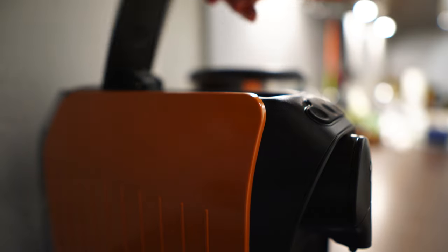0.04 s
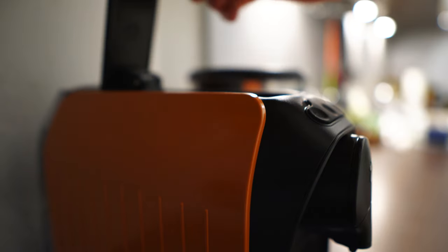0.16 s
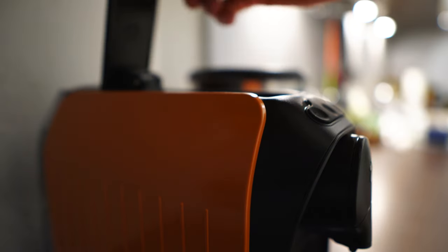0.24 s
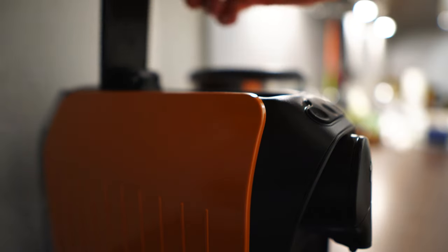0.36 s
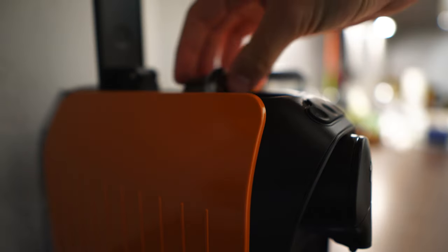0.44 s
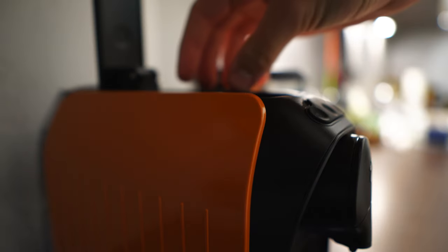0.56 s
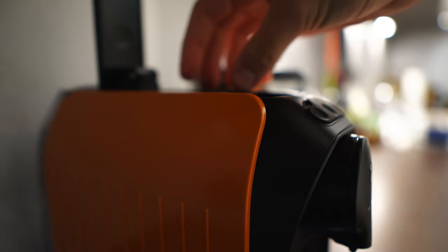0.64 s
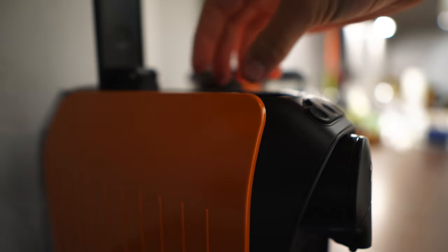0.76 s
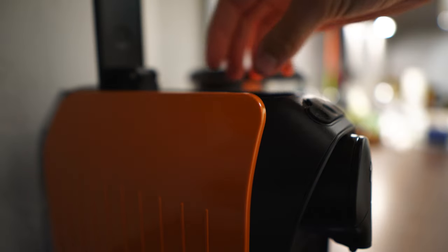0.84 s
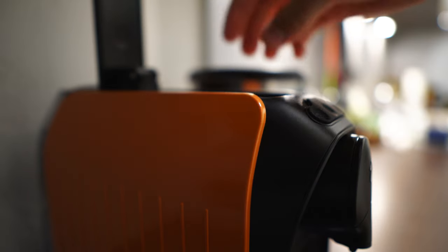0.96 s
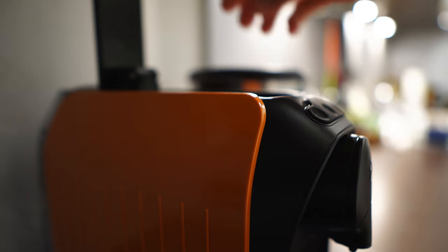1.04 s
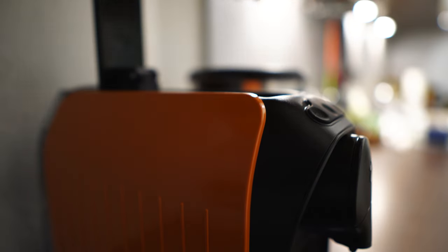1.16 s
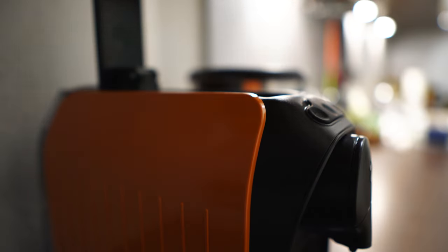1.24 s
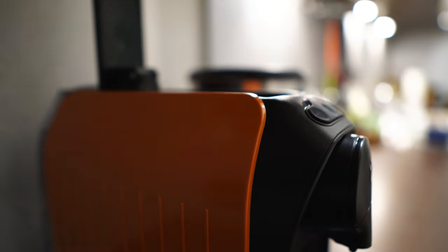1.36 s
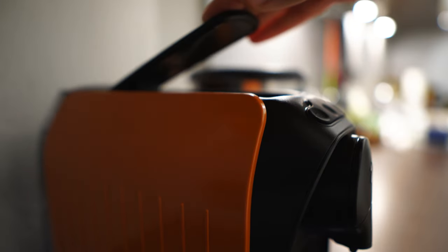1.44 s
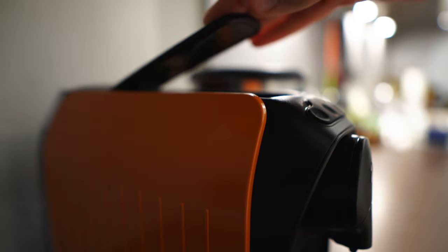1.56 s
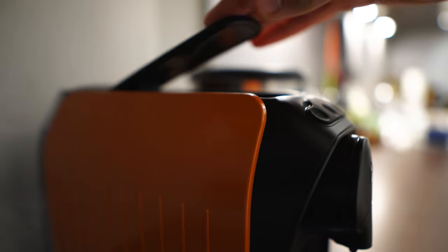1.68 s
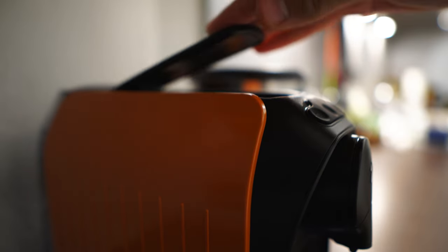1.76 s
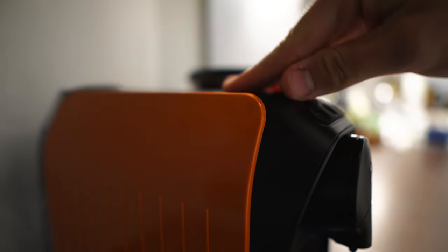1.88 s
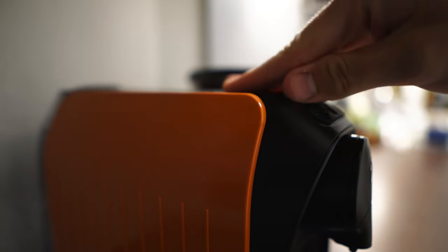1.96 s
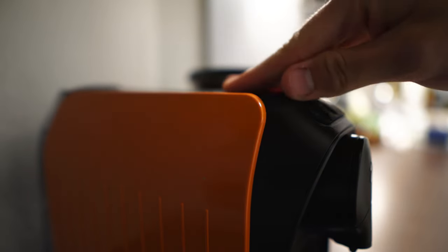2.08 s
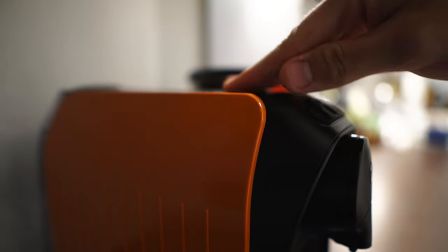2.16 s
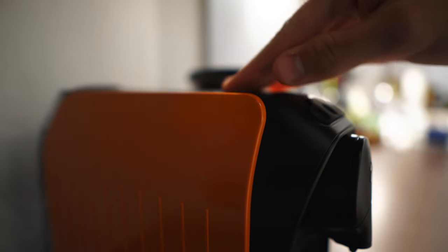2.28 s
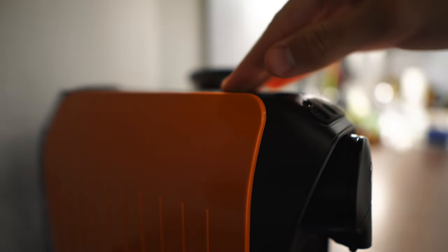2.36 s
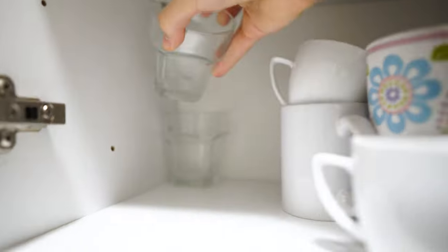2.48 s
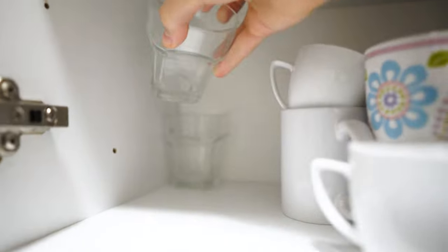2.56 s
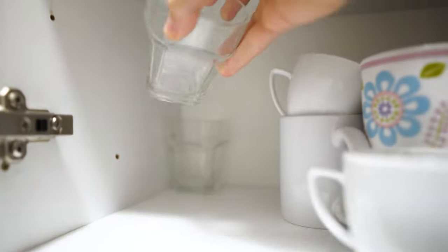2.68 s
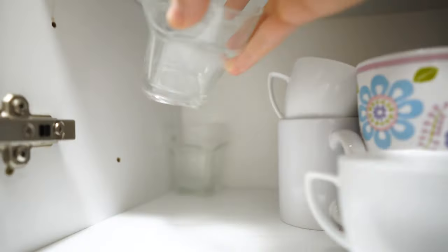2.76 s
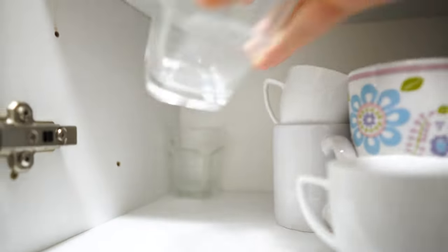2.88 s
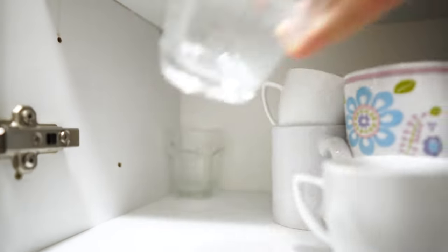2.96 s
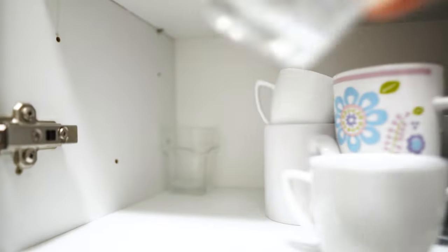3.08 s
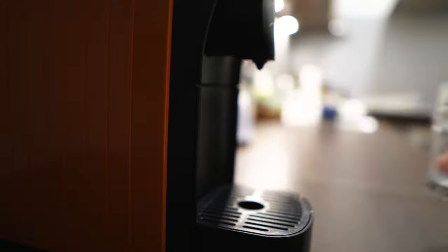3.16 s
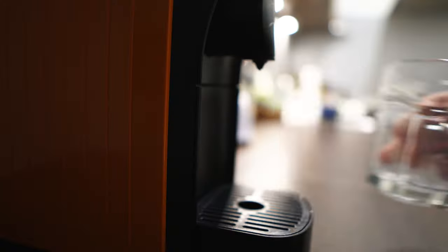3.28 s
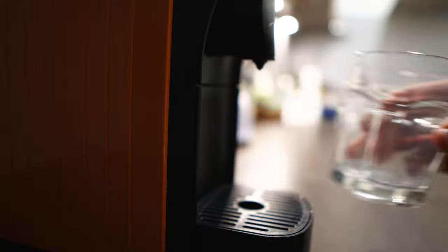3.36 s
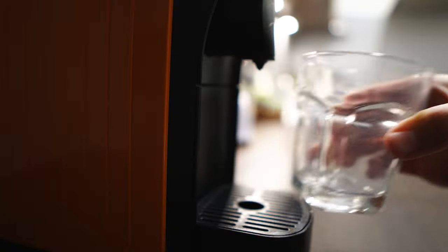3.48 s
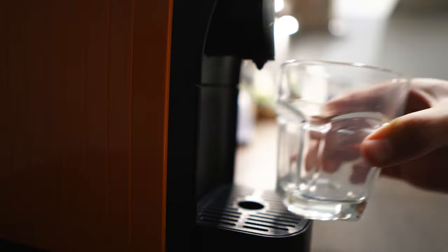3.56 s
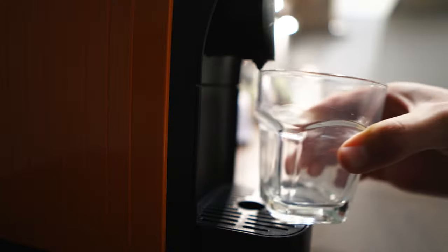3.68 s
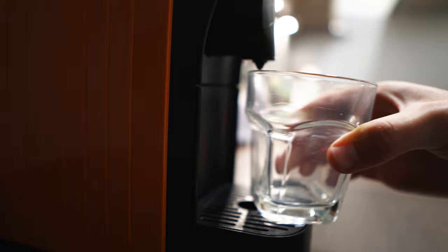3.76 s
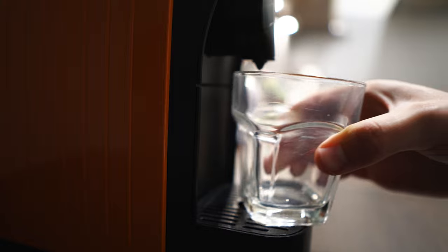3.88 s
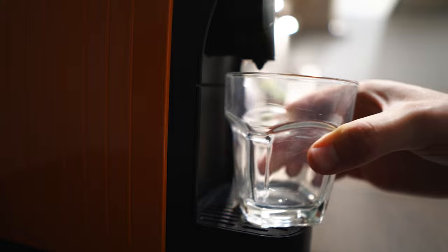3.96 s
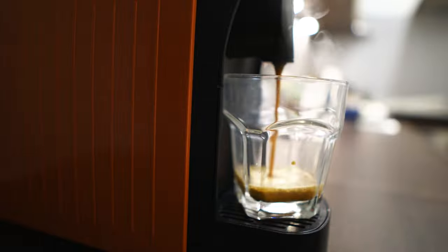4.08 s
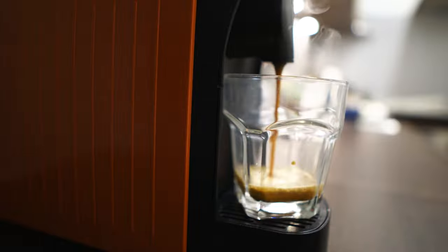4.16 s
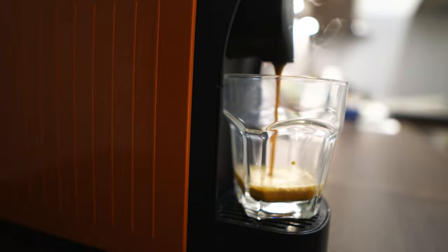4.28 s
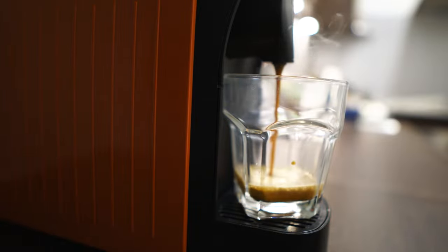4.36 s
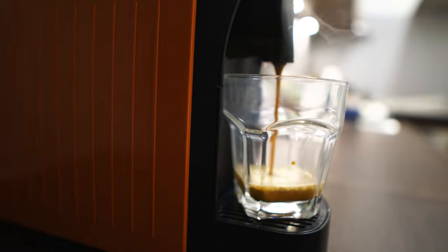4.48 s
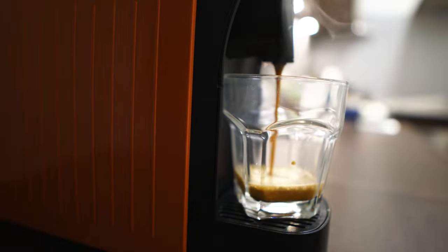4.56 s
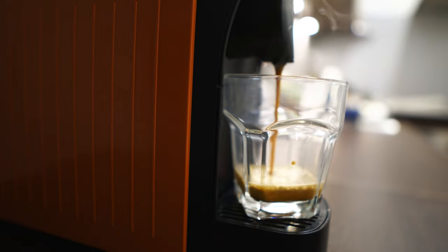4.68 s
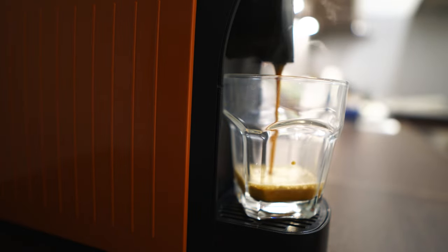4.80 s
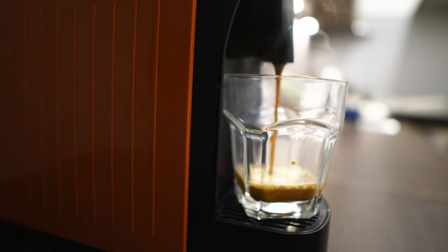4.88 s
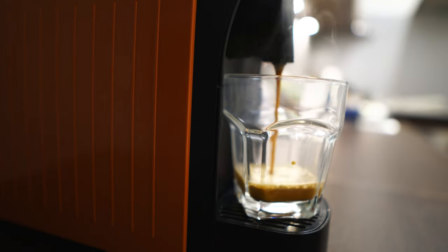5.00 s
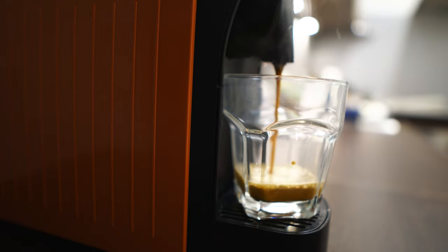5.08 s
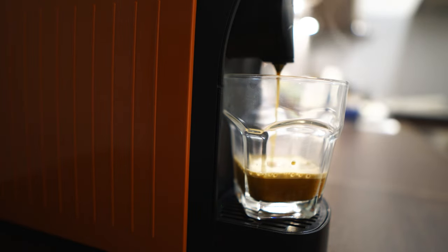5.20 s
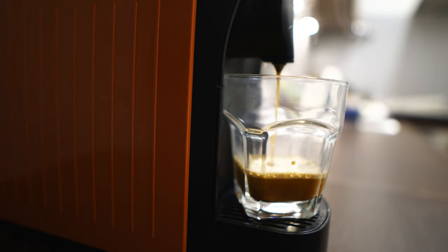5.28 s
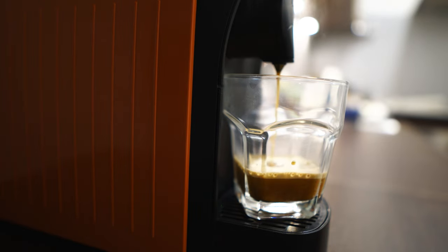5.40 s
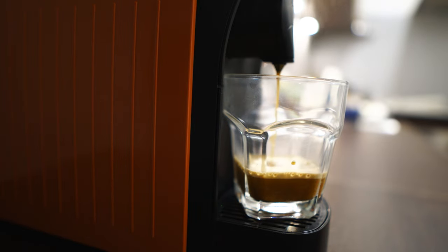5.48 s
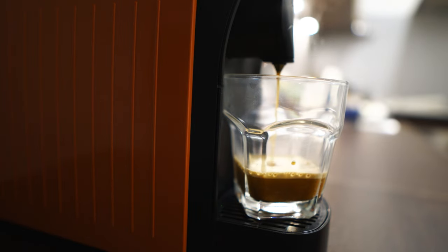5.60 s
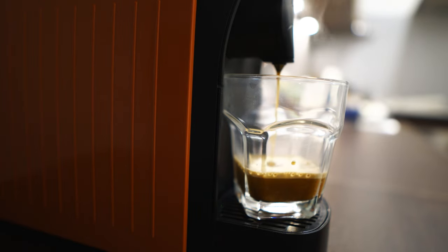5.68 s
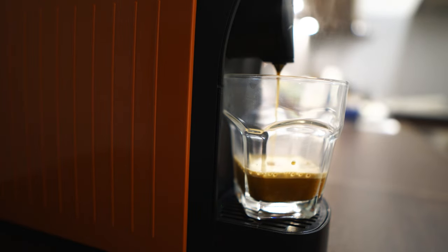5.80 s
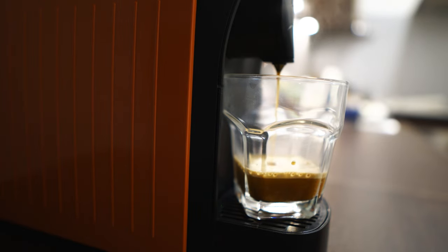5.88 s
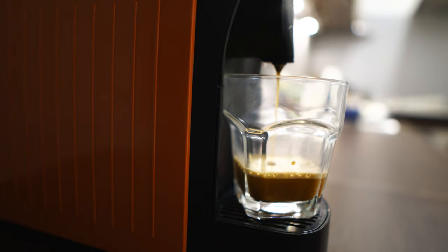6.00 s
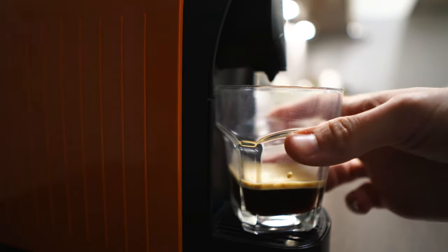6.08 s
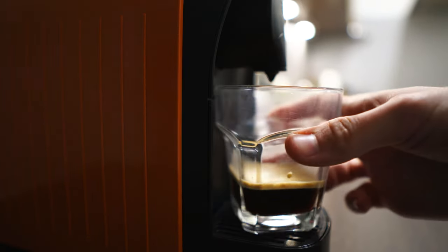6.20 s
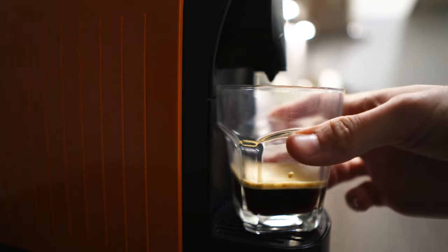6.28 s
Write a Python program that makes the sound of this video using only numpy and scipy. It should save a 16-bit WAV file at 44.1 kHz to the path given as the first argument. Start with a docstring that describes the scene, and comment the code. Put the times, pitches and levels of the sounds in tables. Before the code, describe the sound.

A coffee machine lever cracks open, a capsule drops in, the lever latches shut, a glass lands, then the pump hums briefly and coffee trickles.

```python
"""A capsule espresso machine in a small kitchen, heard from close by over quiet room air.
The lever rubs up, cracks against its stop and chatters; a capsule scrapes in and drops; the lever is pressed shut and latches.
Fingers brush and squeak; a glass lands on the drip tray and is pushed into place; the pump kicks and hums briefly.
Coffee gushes and hisses on in a thin stream joined by drops; at 6.15 s all but pump and background is faded out within 2 ms.
Blows are short noise bursts, coloured and ringing through resonances; rubbing and the coffee stream are random grains,
coloured and faded; the kitchen answers with a diffuse tail."""
import sys
import numpy as np
from scipy import signal
from scipy.fft import rfft, irfft
from scipy.io import wavfile

SR = 44100
rng = np.random.default_rng(int(sys.argv[2]) if len(sys.argv) > 2 else 0)


def materialize(psi):
    """Save the field psi as 16-bit PCM at rate SR to the path in sys.argv[1].

    A 1-D psi becomes a single channel; in a 2-D psi each row is a channel.
    """
    bounded = np.clip(np.atleast_2d(psi).T, -1, 1)
    quanta = np.round(bounded * 32767).astype(np.int16)
    wavfile.write(sys.argv[1], SR, quanta)


N = 279638
TIME = np.arange(N) / SR   # s
SHORT = 16384   # samples in one short blow
BREW_START_S = 4.147   # the pump kicks in and coffee starts to run
FOREGROUND_END_S = 6.15   # all but pump and background has faded out
# How long the kitchen's reflections linger. Each row: frequency in Hz, time to fall by 60 dB in seconds.
KITCHEN_DECAY = [(100, .45), (250, .45), (700, .45), (1500, .48), (5000, 0.46), (8000, .43), (11000, 0.28),
                 (16000, 0.23)]


def amp(db):
    """Decibels to gain."""
    return 10 ** (np.asarray(db) / 20)


def unit(x):
    """Scale to an energy of one."""
    return x / np.sqrt(np.sum(x ** 2) + 1e-20)


def blow_gain(db):
    """Gain that gives a unit-energy blow this level over ten milliseconds."""
    return amp(db) * np.sqrt(SR / 100)


def at_hz(points, hz):
    """Read a table on a log-frequency axis."""
    points = np.array(points)
    return np.interp(np.log(np.maximum(hz, 1)), np.log(points[:, 0]), points[:, 1])


def add(track, s, sound):
    """Mix a sound in at a time."""
    start = max(round(s * SR), 0)
    track[start:start + len(sound)] += sound[:N - start]


def colour(x, spectrum):
    """Causal (minimum-phase) filter with the shape of the given spectrum and unit power gain."""
    level_db = at_hz(spectrum, np.fft.rfftfreq(SHORT, 1 / SR))
    cepstrum = irfft(np.log(amp(level_db)))
    # folding the cepstrum onto positive times makes the filter minimum-phase
    cepstrum[1:SHORT // 2] *= 2
    cepstrum[SHORT // 2 + 1:] = 0
    response = unit(irfft(np.exp(rfft(cepstrum))))
    return signal.fftconvolve(x, response)[:len(x)]


def resonate(x, modes):
    """Parallel resonances with alternating signs; a narrower one rings longer."""
    out = 0
    for k, (hz, width, db) in enumerate(modes):
        r = np.exp(-np.pi * width / SR)
        poles = [1, -2 * r * np.cos(2 * np.pi * hz / SR), r * r]
        ring = (1 - r * r) / 2 * signal.lfilter([1, 0, -1], poles, x + 1e-18)
        out = out + (-1) ** k * amp(db) * ring
    return out


def contact(fade_s):
    """A flurry of micro-contacts that dies fast, about equally strong at all frequencies."""
    t = TIME[:SHORT]
    fade = amp(-30 * np.minimum(t / fade_s, 10))   # 30 dB in fade_s, applied before and after flattening
    flurry = rfft(rng.standard_normal(SHORT) * fade, 2 * SHORT)
    flat = irfft(flurry / np.abs(flurry))[:SHORT]
    onset = np.minimum((t + 1 / SR) / .0005, 1)
    return unit(flat * fade * onset)


def tail(t60_table, build_s):
    """Diffuse reflections: they build up while each band dies at its own rate."""
    t, out = TIME[:SR], 0
    white = rng.standard_normal((2, SR))   # neighbouring bands get unrelated noise
    edges = np.geomspace(60, 19000, 18)   # Hz
    for k, (low, high) in enumerate(zip(edges, edges[1:])):
        sos = signal.butter(3, [low, high], "band", fs=SR, output="sos")
        band = signal.sosfilt(sos, white[k % 2])
        out = out + band * amp(-60 * t / at_hz(t60_table, np.sqrt(low * high)))
    return unit(out * (1 - np.exp(-t / build_s)))


def wash(s, db, spectrum, linger):
    """What a blow sends out through the whole housing comes back as a diffuse wash; linger scales its decay times."""
    track = np.zeros(N)
    reflections = tail(np.array(KITCHEN_DECAY) * [1, linger], build_s=.005)
    add(track, s, blow_gain(db) * unit(colour(reflections, spectrum)))
    return track


def grains(per_s, spread_db):
    """Random tiny slips of uneven size; rms one."""
    born = rng.random(N) < per_s / SR
    uneven = amp(spread_db * np.clip(rng.standard_normal(N), -2, 2))
    return unit(born * rng.standard_normal(N) * uneven) * np.sqrt(N)


def swell(rows, attack_s, fade_db_per_s):
    """Gain for (start, length, dB) rows: each rises from its start and fades after its length; overlaps add in power."""
    power = 0
    for start, length, db in rows:
        rise = np.clip((TIME - start) / attack_s, 0, 1)
        fall_db = np.clip(fade_db_per_s * (TIME - start - length), 0, 200)
        power = power + (rise * amp(db - fall_db)) ** 2
    return np.sqrt(power)


def strike(s, db, crack, modes, crack_fade_s, ring_db):
    """A hard blow: a crack at level db, and the struck part ringing with it at ring_db relative to the crack."""
    snap = unit(colour(contact(crack_fade_s), crack))
    ring = unit(resonate(contact(2 * crack_fade_s), modes))
    track = np.zeros(N)
    add(track, s, blow_gain(db) * (snap + amp(ring_db) * ring))
    return track


def taps(rows, body, fade_s, middle_db):
    """Light touches on one body; brightness tilts the low, middle and treble bands."""
    track = np.zeros(N)
    splits = [signal.butter(4, 2200, fs=SR, output="sos"),
              signal.butter(2, [2200, 6500], "band", fs=SR, output="sos"),
              signal.butter(4, 6500, "high", fs=SR, output="sos")]
    for s, low_db, bright_db in rows:
        ring = body(contact(fade_s), s)
        band_db = low_db, low_db + bright_db + middle_db, low_db + 2 * bright_db
        for db, sos in zip(band_db, splits):
            add(track, s, blow_gain(db) * unit(signal.sosfilt(sos, ring)))
    return track


def background():
    """Room air as coloured noise, two steady hum tones and a low rumble that comes and goes."""
    # Colour of the quiet kitchen. Each row: frequency in Hz, relative level in dB per Hz.
    air_colour = [(20, 0), (45, -0.5), (70, -9), (150, -17.5), (240, -12.5), (400, -20), (700, -26.5),
                  (1100, -28.5), (2000, -35), (4000, -40.5), (9000, -41.5), (16000, -47)]
    # Steady hum. Each row: frequency in Hz, level in dB.
    hum_tones = [(100, -65.5), (280, -75.5)]
    # Spells of low rumble. Each row: start in seconds, length in seconds, level in dB.
    rumble_spells = [(-0.02, .08, -50), (.22, 0.3, -53), (1.92, 0.429, -49), (2.5, 0.722, -40.5),
                     (3.35, .17, -60.5)]
    # Colour of the rumble. Each row: frequency in Hz, relative level in dB per Hz.
    rumble_colour = [(6, -10.5), (13, 0), (20, -13), (35, -25), (70, -30), (150, -43), (400, -73)]
    sound = amp(-62.5) * colour(rng.standard_normal(N), air_colour)
    for hz, db in hum_tones:
        sound = sound + np.sqrt(2) * amp(db) * np.sin(2 * np.pi * (hz * TIME + rng.random()))
    # the spells add to a constant floor of rumble
    rumble_gain = amp(-70) + swell(rumble_spells, attack_s=0.014, fade_db_per_s=700.5)
    return sound + rumble_gain * colour(rng.standard_normal(N), rumble_colour)


def lever():
    """The lever rubs up to its stop and rebounds, then is pressed home and latches; gives (direct, sent to the room)."""
    # The hinge rubs as the lever swings. Each row: start in seconds, length in seconds, level in dB.
    hinge_rubs = [(-0.01, .012, -40), (0.045, .025, -43), (0.29, .04, -62)]
    # Colours of rub, stop, press and latch, then of the washes. Each row: frequency in Hz, relative level in dB per Hz.
    hinge_colour = [(59, -39.5), (100, -18), (399, -1), (582, -11.5), (1110, -4.5), (1630, -11),
                    (1770, -8.5), (2860, -18), (8520, -24), (15000, -46.5)]
    stop_crack = [(71, -47.5), (120, -22), (822, 0), (1520, -10), (1790, -1), (2070, -12), (2640, -2.5),
                  (3240, -7), (4320, -1.5), (4680, -4), (5190, -1.5), (7350, -9), (9020, -4), (9990, -17.5),
                  (16000, -24.5)]
    press_crack = [(59, -35.5), (100, -15), (320, 2), (943, 0), (1520, -10.5), (1860, -0.5), (2840, -15.5),
                   (3680, -14), (4410, -29.5), (5720, -26), (6580, -38), (12000, -55.5), (15600, -83),
                   (22000, -120)]
    latch_crack = [(71, -33.5), (120, -9), (742, -4.5), (1140, -9.5), (1580, 1.5), (1900, -6), (2150, -16),
                   (2930, -2), (3310, -12), (4060, -2), (5870, -11.5), (8660, 0.5), (9590, -16),
                   (12500, -13), (16000, -33)]
    stop_wash = [(70, -40), (120, -19), (240, -9), (300, -1), (550, -8), (870, -4), (1250, -11), (1750, -9),
                 (4400, -9.5), (6600, -12), (9000, -17.5), (10000, -24), (15000, -29)]
    latch_wash = [(70, -55), (120, -24), (243, -2), (387, -17), (550, -16), (740, -10.5), (1000, -16.5),
                  (1280, -15), (1410, -7.5), (1870, -6.5), (2200, -20), (2550, -13.5), (3400, -21.5),
                  (4100, -16.5), (6700, -16.5), (9000, -21), (10000, -26), (15000, -32)]
    # What the lever and the housing ring with. Each row: frequency in Hz, width in Hz, relative level in dB.
    lever_modes = [(310, 25, 1), (708, 20, -2), (814.5, 29, -0.5), (867, 7, 1), (1115, 35, 0.5),
                   (1410, 45, -5.5), (1771, 89, -7), (2432, 150, -8), (2655, 43, -5), (3420, 80, -8),
                   (3903, 170, -12.5), (4420, 71, 0), (6540, 22, -3)]
    housing_modes = [(244, 16, 8.5), (294, 38, 0), (464, 35, -4), (470, 1.5, -8), (595, 20, -4),
                     (761.5, 110, -4.5), (944, 30, -4.5), (1109, 2.5, -17), (1398, 60, -4),
                     (1519, 30, -2.5), (1761, 40, -2), (1901, 55, -3), (2620, 60, -11), (3940, 160, -12),
                     (4773, 110, -11), (6200, 400, -14)]
    rub_gain = swell(hinge_rubs, attack_s=.012, fade_db_per_s=130)
    rub = rub_gain * colour(grains(per_s=5000, spread_db=2), hinge_colour)
    stop = strike(0.1043, db=-20, crack=stop_crack, modes=lever_modes, crack_fade_s=0.019, ring_db=-8)
    rebound = strike(0.1080, db=-23.5, crack=stop_crack, modes=lever_modes, crack_fade_s=0.042, ring_db=-2.5)
    press = strike(1.9113, db=-24, crack=press_crack, modes=housing_modes, crack_fade_s=.05, ring_db=-11)
    latch = strike(1.9355, db=-18, crack=latch_crack, modes=housing_modes, crack_fade_s=.013, ring_db=-4)
    washes = wash(0.108, db=-27.0, spectrum=stop_wash, linger=0.98)
    washes = washes + wash(1.938, db=-18.5, spectrum=latch_wash, linger=1.0)
    blows = stop + rebound + press + latch
    return rub + blows + washes, amp(-13) * rub + amp(-17.5) * blows


def handling():
    """Small plastic ticks, faint squeaks and the brush of fingers; gives (direct, sent to the room)."""
    # Ticks and bumps. Each row: start in seconds, level of the lows in dB, brightness step in dB per band.
    small_ticks = [(0.04, -45, -3), (0.0475, -38.5, -6), (0.0605, -37.5, -8), (0.345, -48.5, -11),
                   (0.462, -51, -11.5), (0.5385, -53.5, -4.5), (0.5925, -43.5, -3.5), (0.608, -48, 2),
                   (0.619, -41, -4), (0.6325, -43, -4), (1.45, -58.5, -5), (1.8445, -69, 1),
                   (1.8765, -57, 2.5), (2.508, -57.5, -5), (3.228, -58, -9), (3.762, -37.5, -6.5),
                   (4.151, -50.5, -8.5), (4.194, -51, -7)]
    # Faint short squeaks. Each row: start in seconds, level in dB.
    squeak_times = [(3.045, -72), (3.18, -75), (3.208, -66.5), (3.535, -74), (3.565, -74), (3.59, -73.5),
                    (3.625, -77)]
    # What a squeak rings with. Each row: frequency in Hz, width in Hz, relative level in dB.
    squeak_modes = [(1850, 210, 6), (3450, 380, -5)]
    # Colour of plastic. Each row: frequency in Hz, relative level in dB per Hz.
    plastic = [(60, -12.5), (250, -1.5), (1200, 0), (5000, -6), (8800, -4), (10000, -10), (16000, -17)]
    ticks = taps(small_ticks + chatter(count=3), lambda x, s: colour(x, plastic), fade_s=0.034, middle_db=1.5)
    squeaks = np.zeros(N)
    for s, db in squeak_times:
        add(squeaks, s, blow_gain(db) * unit(resonate(contact(fade_s=.07), squeak_modes)))
    return ticks + brushing() + squeaks, amp(-12) * ticks


def chatter(count):
    """The lever's evenly spaced bounces on its stop, each weaker than the last: (s, dB, brightness dB)."""
    start_s, gap_s = .1135, .0085
    first_db, loss_db, bright_db = -32, 5, -7
    return [(start_s + k * gap_s, first_db - k * loss_db, bright_db) for k in range(count)]


def brushing():
    """Skin slides over smooth surfaces; each stroke mixes a full brush and a thin hiss."""
    # Fingers on lever and glass. Each row: start in seconds, length in seconds, level in dB, share of thin hiss 0-1.
    finger_strokes = [(1.13, 0.32, -73.5, 0.84), (1.195, .07, -73, 0.96), (1.443, 0.047, -62, 0),
                      (2.507, 0.12, -56.5, .05), (2.745, 0.074, -56.5, .05), (2.975, .13, -74.5, 0)]
    # Colours of full brush and thin hiss. Each row: frequency in Hz, relative level in dB per Hz.
    full_colour = [(470, -28), (800, -12), (1340, -12), (1830, -12), (2240, -10), (5380, -5),
                   (13400, -10.5), (16000, -11)]
    thin_colour = [(2000, -24), (6500, -11), (8700, 0), (14500, -3), (16000, -3)]
    full = colour(rng.standard_normal(N), full_colour)
    thin = colour(rng.standard_normal(N), thin_colour)
    out = 0
    for start, length, db, share in finger_strokes:
        gain = swell([(start, length, db)], attack_s=0.0076, fade_db_per_s=450)
        out = out + gain * (np.sqrt(1 - share) * full + np.sqrt(share) * thin)
    return out


def capsule():
    """The capsule scrapes down its slot and drops into the chamber; gives (direct, sent to the room)."""
    # Scrapes in the slot. Each row: start in seconds, length in seconds, level in dB.
    scrapes = [(.535, 0.025, -58), (.565, 0.017, -55), (.582, 0.014, -38.5), (.606, .006, -39),
               (.621, 0.0091, -44)]
    # Colours of scrape, drop and wash. Each row: frequency in Hz, relative level in dB per Hz.
    scrape_colour = [(120, -36), (270, -1), (460, -10), (1000, 0), (1250, -11.5), (1650, -5), (2200, -15),
                     (5500, -14), (8700, -9), (10500, -17), (14000, -18), (16000, -30)]
    drop_crack = [(71, -42.5), (120, -18), (301, -2), (535, -13), (850, -2), (1230, -8), (1750, 0),
                  (2110, -10), (2700, 0), (2990, -11), (3310, 5.5), (3750, 2), (4100, -11), (5520, -20),
                  (5990, -16), (9020, -14), (10600, -27), (13600, -25), (16000, -36.5)]
    drop_wash = [(70, -50), (120, -20), (250, -0.5), (620, -14), (820, -5), (1000, -10.5), (1730, -6.5),
                 (2050, -12), (3400, -8), (4600, -16), (8500, -20), (10000, -27), (15000, -32)]
    # What the chamber rings with. Each row: frequency in Hz, width in Hz, relative level in dB.
    chamber_modes = [(315, 50, -1), (1100, 48, -5), (1407, 32, 3), (1830, 160, -2), (2568, 10, -5),
                     (2700, 70, -6), (3240, 68, -2.5), (3408, 10, -3), (3708, 78, -7), (4550, 120, -15.5),
                     (6130, 45, -14), (7070, 95, -15), (8140, 40, -14), (9100, 52, -13.5)]
    slide_gain = swell(scrapes, attack_s=.004, fade_db_per_s=1100)
    slide = slide_gain * colour(grains(per_s=6400, spread_db=1.5), scrape_colour)
    drop = strike(0.6452, db=-18.5, crack=drop_crack, modes=chamber_modes, crack_fade_s=0.012, ring_db=-6.5)
    direct = slide + drop + wash(0.648, db=-34, spectrum=drop_wash, linger=.9)
    return direct, amp(-12) * slide + amp(-25) * drop


def glass():
    """The glass lands on the drip tray, judders across it and nudges the back; gives (direct, sent to the room)."""
    # Pushes across the tray. Each row: start in seconds, length in seconds, strength of the push in dB.
    pushes = [(3.785, .02, -43), (3.86, 0.017, -42.5), (3.903, 0.12, -45.5), (4.065, 0.1, -50.5)]
    # Colours of landing, nudge, slide and grit under the glass. Each row: frequency in Hz, relative level in dB per Hz.
    landing_crack = [(45, -23), (80, -4), (110, -0.5), (160, -21), (280, -2.5), (420, -10), (600, -15.5),
                     (900, -3), (1050, -9), (1230, 4), (1650, -13), (2600, -20.5), (4100, -32.5),
                     (6100, -41), (8800, -24.5), (10400, -48), (14000, -43), (16000, -54)]
    nudge_crack = [(180, -46), (300, -12), (645, -29), (1170, -3.5), (1720, 0.5), (2520, -14), (2930, -13),
                   (4090, -20), (5520, -17), (6620, -26), (7950, -11), (16000, -43)]
    slide_colour = [(47, -33.5), (80, 2), (107, 0.5), (174, -9), (242, 6.5), (346, 4), (482, 4.5),
                    (687, -16), (768, 3), (1220, 4), (1860, -16), (6450, -27.5), (7700, -19), (16000, -43)]
    scratch_colour = [(1200, -14), (2100, 0.5), (3500, -6), (8500, -5), (11000, -13), (16000, -14)]
    # What the tray rings with. Each row: frequency in Hz, width in Hz, relative level in dB.
    tray_modes = [(113.3, 19, 10.5), (378.4, 42, 7), (477.4, 18, 7), (775, 22, 8.5), (920, 18, 6),
                  (980, 22.2, 5), (1215, 45, 10.5), (1385, 17, 7.5), (1750, 66, -14), (2054, 33, -10),
                  (2280, 10, -24), (2590, 38, -12), (2790, 81, -34)]
    landing = strike(3.7677, db=-23.5, crack=landing_crack, modes=tray_modes, crack_fade_s=0.012, ring_db=-3.5)
    nudge = strike(4.0638, db=-42.0, crack=nudge_crack, modes=tray_modes, crack_fade_s=0.032, ring_db=-7.5)
    slips = grains(per_s=2900, spread_db=1.5)
    push = swell(pushes, attack_s=.008, fade_db_per_s=216) * judder(per_s=60, spread_db=2)
    tray_ring = unit(resonate(slips, tray_modes)) * np.sqrt(N)   # rms one
    slide = push * (amp(-3) * colour(slips, slide_colour) + amp(-7) * tray_ring)
    scratches = amp(-22.5) * push * colour(grains(per_s=700, spread_db=4), scratch_colour)
    sound = landing + nudge + slide + scratches
    return sound, amp(-16.5) * sound


def judder(per_s, spread_db):
    """Gain that wanders at random as a sliding thing sticks and slips."""
    spots = np.arange(0, TIME[-1], 1 / per_s)
    return amp(spread_db * np.interp(TIME, spots, rng.standard_normal(len(spots))))


def pump():
    """A piston driven at mains rate: a low hum, and a rough buzz pulsing with the strokes that kicks and then settles."""
    # Colour of the buzz. Each row: frequency in Hz, relative level in dB per Hz.
    buzz_colour = [(47, -40), (80, -14), (254, 0.5), (428, -6.5), (539, -42), (629, -12.5), (1260, -16),
                   (1440, -16.5), (8000, -37), (10400, -62), (17600, -120)]
    stroke = np.sin(2 * np.pi * 50 * TIME)
    buzz = colour(rng.standard_normal(N) * (1 + 0.21 * stroke), buzz_colour)
    # rows of start in seconds, length in seconds, level in dB
    hum = swell([(BREW_START_S, 0.41, -56)], attack_s=.008, fade_db_per_s=60)
    kick = swell([(BREW_START_S, .012, -43.5)], attack_s=0.0064, fade_db_per_s=232)
    settled = swell([(BREW_START_S, .05, -64.5)], attack_s=.02, fade_db_per_s=39)
    return np.sqrt(2) * hum * stroke + np.hypot(kick, settled) * buzz


def coffee():
    """A gush settles to a fizzing stream, which drops later join; gives (direct, sent to the room)."""
    # Colour of the stream. Each row: frequency in Hz, relative level in dB per Hz.
    stream_colour = [(250, -16), (500, -6), (900, -5), (1400, -6), (2100, -10), (3500, -8.5), (4700, -12),
                     (6200, -13.5), (7300, -13), (8700, -10), (9700, -17.5), (11500, -21.5), (13300, -16),
                     (16000, -29)]
    gush = swell([(BREW_START_S, 0.13, -63.5)], attack_s=.02, fade_db_per_s=33)
    steady = amp(-70.5) * (TIME > BREW_START_S)
    stream = np.hypot(gush, steady) * colour(grains(per_s=9000, spread_db=4), stream_colour)
    drips = taps(drops(), cup, fade_s=0.0046, middle_db=-4.5)
    return stream + drips, amp(-15.0) * drips + amp(-10) * stream


def drops():
    """The larger drops, the bead that each throws up, and random droplets between: (s, dB, brightness dB)."""
    # Larger drops landing. Each row: start in seconds, level of the lows in dB, brightness step in dB per band.
    large = [(5.21, -48.5, -11.5), (5.282, -46.5, -6), (5.378, -47, -12.5), (5.416, -57.5, 2.5),
             (5.552, -36, -5), (5.5633, -50.5, 3.5), (5.604, -44, -8), (5.6111, -44, 0.5),
             (5.6809, -35.5, -5), (5.766, -44, -6), (5.829, -47.5, -5), (5.8455, -36.5, -5.5),
             (5.892, -50.5, 0), (5.982, -47, -10), (6.039, -41, -1.5), (6.072, -34.5, -11),
             (6.135, -43.5, -11)]
    # each bead falls back a little later, weaker and duller
    beads = [(s + .009 * rng.uniform(.7, 1.3), db - 13, bright - 4) for s, db, bright in large]
    droplets, per_s = [], 22
    for s in np.arange(5.55, FOREGROUND_END_S, 1 / per_s):
        landing_s = s + rng.random() / per_s
        low_db, bright_db = rng.normal([-55.5, -6.5], 2.5)
        droplets.append((landing_s, low_db, bright_db))
    return large + beads + droplets


def cup(splash, s):
    """Each drop lands elsewhere and weights the resonances anew; their pitch creeps up as the glass fills."""
    # What the filling glass rings with. Each row: frequency in Hz before the rise, width in Hz, mean level in dB.
    cup_modes = [(533, 19.5, 1), (1023, 62, -3), (1386, 87, 2.5), (2350, 155, -6), (2736, 82, -10.5),
                 (3330, 220, -8.5), (3950, 120, -13.5), (4720, 160, -10), (5630, 150, -21.5),
                 (7260, 330, -13.5), (8030, 220, -16), (8730, 310, -12), (9800, 180, -21),
                 (12700, 420, -26)]
    hz, width, db = np.transpose(cup_modes)
    rise = 1 + .07 * (s - 5.8)
    rise = rise * (1 + 0.024 * rng.standard_normal(len(hz)))   # pitch differs from drop to drop
    uneven_db = rng.normal(0, 2.5, len(db))
    # the short slap of the landing itself is heard beside the resonances
    return resonate(splash, zip(hz * rise, width, db + uneven_db)) + amp(-34) * splash


def scene():
    """All sources in one kitchen; all but pump and background is faded out within 2 ms at 6.15 s."""
    direct, sent = np.sum([lever(), handling(), capsule(), glass(), coffee()], axis=0)
    room = signal.fftconvolve(sent, tail(KITCHEN_DECAY, build_s=.008))[:N]
    foreground_gain = np.clip((FOREGROUND_END_S - TIME) / 0.0023, 0, 1)
    return ((direct + room) * foreground_gain + pump() + background())[None]


def record(dry):
    """Everything above 16.3 kHz is filtered away steeply."""
    return signal.sosfilt(signal.ellip(10, .1, 80, 16300, fs=SR, output="sos"), dry)


dry = scene()
out = record(dry)
materialize(out)
```